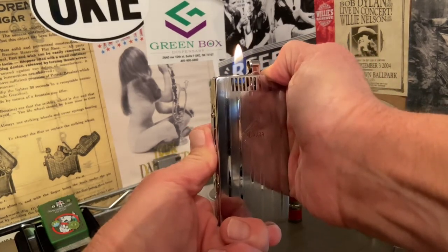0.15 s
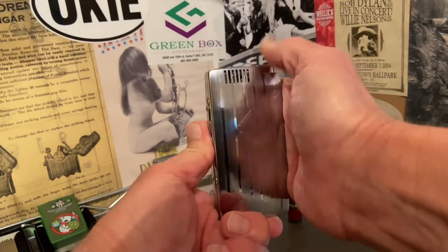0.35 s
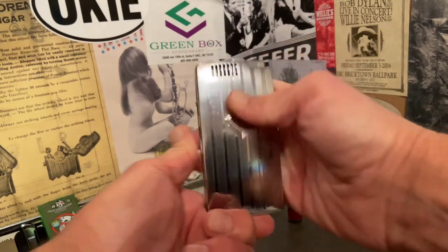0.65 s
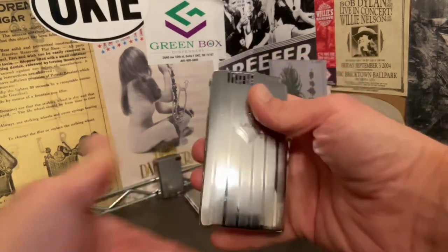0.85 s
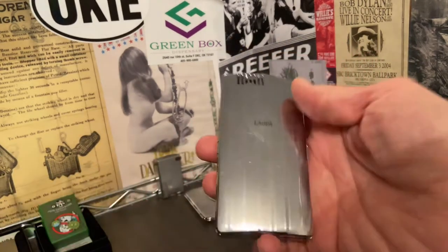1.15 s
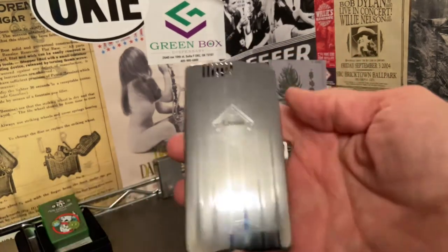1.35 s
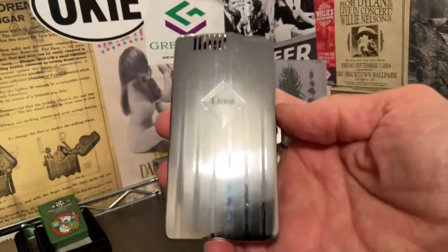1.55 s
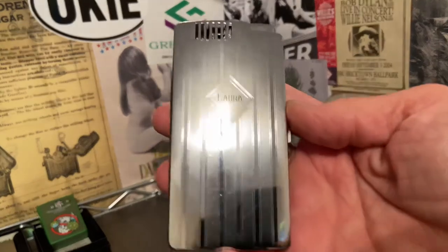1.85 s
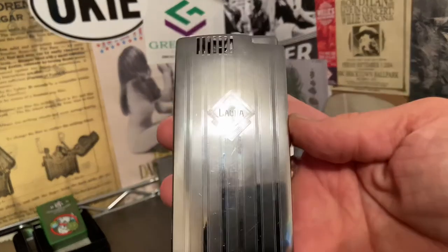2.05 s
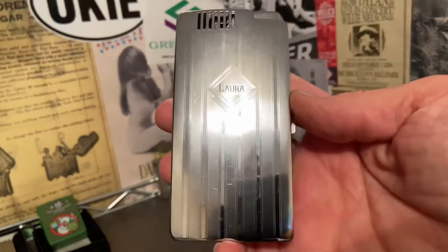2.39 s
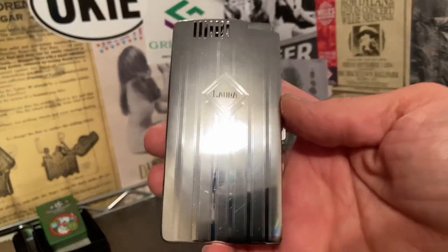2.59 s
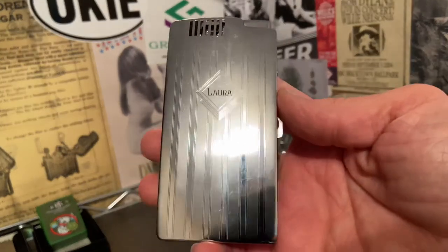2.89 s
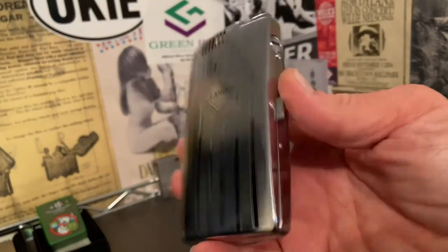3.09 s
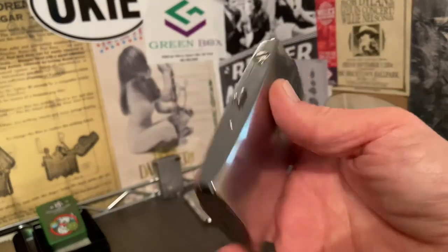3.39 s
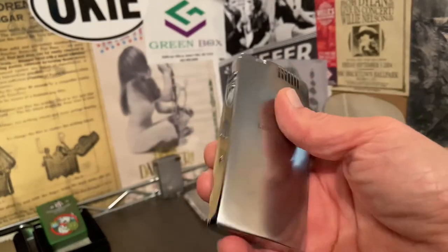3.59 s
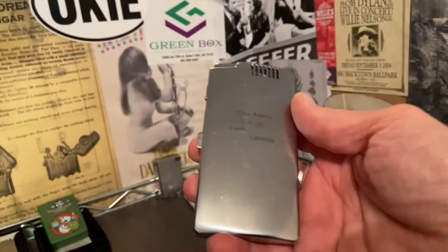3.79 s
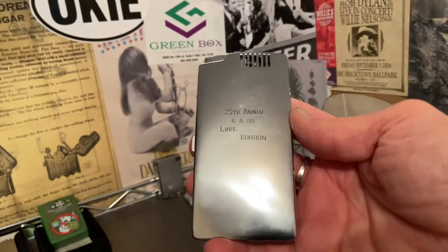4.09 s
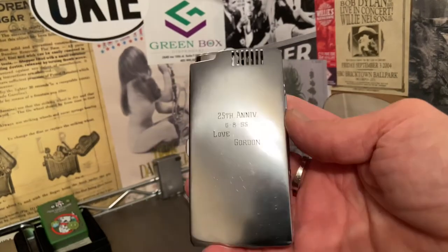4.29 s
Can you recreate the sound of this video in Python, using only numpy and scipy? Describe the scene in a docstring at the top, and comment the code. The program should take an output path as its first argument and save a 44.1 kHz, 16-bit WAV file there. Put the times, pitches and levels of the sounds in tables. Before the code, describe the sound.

In a small quiet room, close to a stereo microphone, a metal lighter cap snaps shut almost at once with a bright, dry crack. A damped clack of the thin metal case follows near one second, then a thumb drags across it with a brief squeak. Soft finger rustles come later, strongest near three and a half seconds. A low wavering hum continues throughout.

```python
"""A small metallic snap, one clack, a dragging thumb and rustling fingers are heard over a low room hum.
A metal cigarette case with a built-in lighter is handled close to a two-port microphone: its cap snaps
shut and the case knocks in the hand, each as a burst of noise plus fading sine tones. Skin slipping on
the metal is grainy noise, squeaks are narrow gliding noise, and echoes are sparse random reflections.
The hum is a wavering tone with bands of noise for rumble, drone and air."""
import sys
import numpy as np
from scipy import signal
from scipy.fft import rfft, irfft
from scipy.io import wavfile
from scipy.ndimage import uniform_filter1d

SR = 44100
rng = np.random.default_rng(int(sys.argv[2]) if len(sys.argv) > 2 else 0)


def dump(signal):
    """Clip the signal to [-1, 1] and save it as 16-bit WAV at the path in sys.argv[1]."""
    limited = np.clip(np.atleast_2d(signal).T, -1, 1)
    pcm = np.round(limited * 32767).astype(np.int16)
    wavfile.write(sys.argv[1], SR, pcm)


N = 195759
TIME = np.arange(N) / SR  # seconds
HZ = np.fft.rfftfreq(N, 1 / SR)  # the frequencies in a spectrum of the whole sound

# The cap's catch and stop. Each row: start in seconds, level in dB over 10 ms, contact decay in seconds,
# brightness in dB per octave, ring against contact in dB.
CAP_SNAPS = [(.1975, -69.5, .001, 5, -3), (.2010, -59.5, 0.0081, -7.5, -9), (.2090, -63, 0.0047, -9.5, -6),
             (.2160, -52.5, 0.0045, -8.5, -3.5), (.2252, -57, .001, -1, -7), (.2279, -35.5, .00044, 8, -2),
             (.2290, -42.5, .004, -4.5, -9), (.2366, -43, .0022, .5, -2.5), (.2385, -23.5, .0006, 2.5, -7),
             (.2398, -27, .0013, -1, -9.5)]
# Knocks on the case. Each row: start in seconds, level in dB over 10 ms, contact decay in seconds,
# brightness in dB per octave, ring against contact in dB (low where a finger damps it).
CASE_KNOCKS = [(.442, -80, 0.009, -3, -4), (.468, -74, .0045, -7, -7.5), (.509, -72, 0.0074, -11, 2),
               (.5765, -60, 0.0053, -6.5, -8), (.600, -69.5, 0.0038, -14, -9),
               (.716, -73, 0.011, -6.5, -3.5), (.9464, -35, 0.0027, -1, 4),
               (.9530, -51.5, 0.0083, -4, -6.5), (1.1795, -59.5, 0.0057, -6.5, 10),
               (1.954, -75.5, 0.0016, -8, -13.5)]
# Tones the cap rings with. Each row: pitch in Hz, relative level in dB, time to fade by 60 dB in seconds.
CAP_MODES = [(760, -12.5, 0.039), (936, -12, 0.093), (1396, -9, .03), (1793, -16.5, .03),
             (2909, -17.5, 0.046), (3395, -13.5, 0.035), (4590, -25, 0.087), (5460, -8, 0.028),
             (6316, -13, .03), (7180, -13, 0.043), (8640, -16, 0.028), (10240, -9.5, 0.0199),
             (10836, -14.5, .04), (11906, 3.5, 0.017), (11900, -4, 0.014), (14080, -5, 0.018),
             (15800, -4, .018)]
# Tones the case rings with. Each row: pitch in Hz, relative level in dB, time to fade by 60 dB in seconds
# before the hand damps it.
CASE_MODES = [(640.4, -21.5, 0.063), (924, -5, 0.067), (1175, -12.5, 0.16), (1267, -5.5, 0.16),
              (1584, 1.5, 0.038), (1750, 6.5, 0.037), (1863, -3, 0.23), (2000, -19.5, 0.11),
              (2202, -15, 0.2), (2287, -8.5, 0.21), (2670, -8, 0.19), (3070, -4, 0.28), (3340, -1.5, 0.086),
              (4070, -6, 0.1), (6110, -15.5, .07), (6880, -15.5, 0.059), (7860, -27.5, .06),
              (8900, -20.5, 0.049)]
# Colour of the contact noise on the cap. Each row: frequency in Hz, relative level in dB per Hz.
CAP_CONTACT = [(250, -31), (480, -24.5), (720, 2), (1000, -5), (1500, -11), (2200, -12.5), (3200, -7.5),
               (4400, -11.5), (5400, -4), (7200, -1.5), (8600, -2), (10500, -1.5), (11500, 4.5),
               (12900, -11.5), (14800, -0.5)]
# Colour of the contact noise on the case. Each row: frequency in Hz, relative level in dB per Hz.
CASE_CONTACT = [(250, -31.5), (480, -24), (750, -4), (1050, 0.5), (1700, 1.5), (2500, -6), (4000, -2),
                (5500, -5), (8000, 1.5), (10300, -9), (12000, -11), (15500, -20)]
# The thumb's strokes across the face. Each row: firmest moment in seconds, length in seconds,
# grip level in dB, sliding hiss level in dB.
THUMB_STROKES = [(1.106, .13, -66.5, -81.5), (1.16, 0.1, -62, -77), (1.206, 0.065, -56, -83)]
# The fingers' strokes on the edges. Each row: firmest moment in seconds, length in seconds,
# grip level in dB, sliding hiss level in dB.
FINGER_STROKES = [(.692, 0.049, -80, -71.5), (1.345, 0.12, -92, -84), (1.415, 0.095, -91, -78),
                  (1.615, 0.47, -90, -79.5), (2.88, 0.53, -85.5, -92), (3.055, 0.061, -88, -81),
                  (3.088, .11, -78, -91), (3.158, 0.08, -72.5, -86), (3.28, 0.26, -80.5, -82),
                  (3.372, 0.097, -70.5, -73.5), (3.478, 0.067, -66, -79), (3.502, 0.091, -69.5, -63),
                  (3.545, 0.11, -76, -72), (3.63, .15, -95, -81)]
# Resonances of the shell under the thumb. Each row: centre in Hz, width in Hz, relative level in dB.
PRESSED_SHELL = [(920, 43, -3), (1113, 21, -3), (1220, 44, -5), (1550, 47, -23), (1824, 21, 3),
                 (2000, 74, -14), (2176, 74, -7), (2794, 60, -11), (3120, 240, -22.5), (3690, 24, -11.5),
                 (4930, 62, -22.5)]
# Resonances of the shell held by its edges. Each row: centre in Hz, width in Hz, relative level in dB.
HELD_SHELL = [(1157, 130, 1.5), (1244, 80, 5.5), (1533, 130, 3), (2050, 140, -2.5), (2160, 110, 0),
              (2870, 100, -3), (3160, 49, -9), (3400, 26, -12), (4100, 57, -14), (4840, 130, -12),
              (5900, 41, -12)]
# Colour of the hiss of sliding skin. Each row: frequency in Hz, relative level in dB per Hz.
SKIN_HISS = [(500, -25), (1200, -9), (2400, 0.5), (3000, 4), (4300, 1), (5100, 4), (6000, -3.5),
             (7300, 1.5), (8500, -10.5), (11300, -2), (13000, -1.5), (15500, -8.5)]
# Squeaks of a fingertip on the polish. Each row: start in seconds, length in seconds, first pitch in Hz,
# last pitch in Hz, width in Hz, level in dB.
SQUEAKS = [(0.557, 0.077, 7000, 7200, 250, -80.5), (1.063, 0.19, 7290, 7030, 705, -79),
           (1.088, 0.047, 1570, 1510, 69.6, -66.5), (1.149, 0.089, 6140, 6100, 355, -73),
           (1.17, 0.04, 1212, 1070, 81, -48), (1.95, .014, 1283, 1250, 60.3, -70.5),
           (3.031, .046, 7960, 7740, 600, -85), (3.239, .11, 4450, 3860, 197, -84.5),
           (3.316, 0.1, 3920, 3820, 160, -82), (3.576, 0.076, 3830, 3830, 200, -87)]
# Level of the room's low hum, before its random wavering. Each row: time in seconds, level in dB.
HUM_LEVEL = [(0.0, -59), (0.27, -45), (1.07, -54), (1.38, -49.5), (1.53, -57), (1.67, -44.5), (1.84, -57.5),
             (2.16, -40), (2.26, -54), (2.45, -43.5), (3.06, -49.5), (3.15, -38), (3.5, -46), (3.57, -55.5),
             (3.95, -55.5), (3.98, -50), (4.41, -54.5), (4.44, -66)]
# Resonances of the deep rumble. Each row: centre in Hz, width in Hz, relative level in dB.
DEEP_RUMBLE = [(59.2, 5.2, 0), (72.4, 36, -8.5)]
# Resonances of the upper rumble. Each row: centre in Hz, width in Hz, relative level in dB.
UPPER_RUMBLE = [(120, 7, 2), (143, 3.5, 1.5), (160, 5.2, -2.5), (167.4, 27, -10.5), (200, 7.6, -7),
                (221, 4.1, -4)]
# Resonances of the drone. Each row: centre in Hz, width in Hz, relative level in dB.
DRONE = [(258.5, 5.9, 1.5), (300, 8.4, -15), (340.8, 9.3, -9), (390, 59, -29.5)]
# Level of the drone. Each row: time in seconds, level in dB.
DRONE_LEVEL = [(0.0, -68.5), (1.05, -63.5), (1.17, -73), (1.8, -59), (1.82, -67), (2.84, -64.5),
               (3.08, -54), (3.65, -66.5), (4.21, -63), (4.31, -78), (4.44, -70)]
# Colour of the room's air noise. Each row: frequency in Hz, relative level in dB per Hz.
AIR = [(20, -11), (40, 1), (150, 19), (300, 6), (420, 0), (520, -8.5), (700, -9.5), (1200, -19),
       (2500, -23.5), (5000, -25.5), (8000, -31), (11500, -32), (13000, -38), (16000, -43)]
# How the two microphone ports differ. Each row: frequency in Hz, left lead in radians, left minus right in dB.
PORTS = [(297, 0, -0.5), (654.8, 1.4, 1.5), (950, 1, 1.5), (1230, 1.44, 2.5), (1710, 0.82, 2.5),
         (2259, 0.5, 1), (2950, 1.56, 3), (3940, 0.88, 3), (5330, 1.45, 4), (7366, 0.3, 1.5),
         (10584, -6.5, -1.5), (12100, -7.5, 2), (13285, -10, -1), (15800, -11.5, -0.5), (15850, -9, 2)]

HAND_DAMPING_DB_PER_S = 299.5  # the palm shortens the ring of the case
# a stroke swells for this share of its length, then relaxes; its ends lie STROKE_EDGE_DB under its top
STROKE_RISE, STROKE_EDGE_DB, STROKE_CURVE = .42, 18, 1.5
# the hum wavers at random in pitch and level
HUM_HZ, HUM_WANDER_HZ, HUM_WANDER_DB, HUM_WANDERS_PER_S = 99.15, 1.9, 1.33, 5
# the upper rumble takes a share of the hum's swells
DEEP_DB, UPPER_DB, UPPER_FOLLOWS = -54, -54, 0.45
AIR_DB = -65.5
LOW_CUT_HZ, EDGE_HZ = 40, 15900


def cap_snaps():
    """The lighter's cap hits its catch and stop, which makes it crack and ring."""
    return blows(CAP_SNAPS, CAP_MODES, CAP_CONTACT, side_db=-9.0)


def case_knocks():
    """The case is knocked in the hand, which damps its ring."""
    return blows(CASE_KNOCKS, CASE_MODES, CASE_CONTACT, side_db=-5.0, damping_db_per_s=HAND_DAMPING_DB_PER_S)


def blows(rows, modes, colour, side_db, damping_db_per_s=0, size=2048):
    """Each blow is a short chatter of contacts together with the ring of the struck part."""
    out = np.zeros((2, N))
    t = np.arange(SR // 4) / SR
    bins = np.fft.rfftfreq(size, 1 / SR)
    for s, db, decay, tilt_db, ring_db in rows:
        def tilt(hz):
            """Brightness in dB, pivoting at 3000 Hz."""
            return tilt_db * np.log2(np.clip(hz, 700, 12000) / 3000)

        contact = (t / decay) ** .5 * np.exp(-t / decay)
        chatter = pair(*(rng.standard_normal((2, len(t))) * contact), side_db)
        colouring = causal(read(colour, bins) + tilt(bins), size)
        chatter = signal.fftconvolve(chatter, colouring[None])[:, :len(t)]
        ring = np.zeros(len(t))
        for hz, mode_db, t60 in modes:
            fade_db = (60 / t60 + damping_db_per_s) * t
            ring += amp(mode_db + tilt(hz) - fade_db) * np.sin(2 * np.pi * (hz * t + rng.random()))
        ring *= 1 - np.exp(-2 * t / decay)  # builds up while the contact lasts
        sound = unit(unit(chatter) + amp(ring_db) * unit(ring))
        sound *= np.sqrt(.01 / t[-1])  # levels are given as if the energy filled 10 ms
        add(out, s, amp(db) * sound)
    return out


def thumb_drags():
    """The thumb pushes across the face of the case, in coarse slips."""
    return rub(THUMB_STROKES, PRESSED_SHELL, shell_side_db=-10, hiss_side_db=-16, grain_db=5, ripple_db=8)


def finger_rustle():
    """Fingers shift on the edges as they turn the case round, in finer slips."""
    return rub(FINGER_STROKES, HELD_SHELL, shell_side_db=-9.0, hiss_side_db=-14.0, grain_db=2.5, ripple_db=7.5)


def rub(strokes, shell, shell_side_db, hiss_side_db, grain_db, ripple_db):
    """Tiny slips of skin ring the shell where it grips, and hiss through its crowded upper modes as it glides."""
    grip_power, glide_power = np.zeros(N), np.zeros(N)
    for s, length, grip_db, hiss_db in strokes:
        stroke_db = pressure(s, length)
        grip_power += amp(stroke_db + grip_db) ** 2
        glide_power += amp(stroke_db + hiss_db) ** 2
    # random bumps in the hiss spectrum stand for the crowded modes
    bumps = rng.uniform(-1, 1, size=200)
    crowded_db = ripple_db * np.interp(HZ, np.linspace(0, SR / 2, num=200), bumps)
    ring = noise(peaks(shell), shell_side_db, grain_db) * np.sqrt(grip_power)
    hiss = noise(amp(read(SKIN_HISS, HZ) + crowded_db), hiss_side_db, grain_db) * np.sqrt(glide_power)
    return ring + hiss


def pressure(s, length):
    """Level in dB of one stroke: the finger bears down, then relaxes more slowly."""
    away = np.maximum((s - TIME) / STROKE_RISE, (TIME - s) / (1 - STROKE_RISE)) / length
    return -STROKE_EDGE_DB * np.minimum(away, 10) ** STROKE_CURVE


def squeaks():
    """Stick and slip: a narrow band of noise that swells, glides in pitch and dies."""
    out = np.zeros((2, N))
    for s, length, start_hz, end_hz, width, db in SQUEAKS:
        count = int(length * SR)
        narrow = 1 / (1 + (2 * HZ / width) ** 2)
        flutter = irfft(rfft(rng.standard_normal((2, N))) * narrow, N)[:, :count]
        phase = 2 * np.pi * np.cumsum(np.linspace(start_hz, end_hz, count)) / SR
        tone = unit(flutter[0] * np.cos(phase) + flutter[1] * np.sin(phase))
        add(out, s, amp(db) * (tone * np.hanning(count))[None])
    return out


def room(x, wet_db, t60_low, t60_high, gap=0.0057, side_db=-3):
    """Sparse reflections from the shelf and walls, partly shared by both sides; bass and treble fade apart."""
    t = np.arange(SR // 2) / SR
    strengths = rng.standard_normal((2, len(t)))
    present = rng.random((2, len(t))) < .15
    taps = pair(*(strengths * present * (t > gap)), side_db)
    # let each frequency fade at its own rate
    hz, at, z = signal.stft(taps, SR, nperseg=256)
    t60 = read([(1500, t60_low), (14000, t60_high)], hz)[:, None]
    tail = signal.istft(z * amp(-60 * at / t60), SR, nperseg=256)[1]
    tail /= np.linalg.norm(tail[0])
    return x + amp(wet_db) * signal.fftconvolve(x, tail, axes=1)[:, :N]


def hum_tone(level_db):
    """A sine near 100 Hz that wavers in pitch and level."""
    pitch = HUM_HZ + HUM_WANDER_HZ * wander(HUM_WANDERS_PER_S)
    tone = np.sqrt(2) * np.sin(2 * np.pi * np.cumsum(pitch) / SR)
    return tone * amp(level_db + HUM_WANDER_DB * wander(HUM_WANDERS_PER_S)) * pan(left_db=4.5)


def rumble(hum_db):
    """Noise in the low resonances of the room: a steady deep part and an upper part that follows the hum."""
    deep = steadied(noise(peaks(DEEP_RUMBLE), side_db=-13.5), span=.25) * amp(DEEP_DB) * pan(left_db=1.3)
    upper_db = UPPER_DB + UPPER_FOLLOWS * (hum_db - hum_db.mean())
    upper = steadied(noise(peaks(UPPER_RUMBLE), side_db=-12.5), span=.25)
    return deep + upper * amp(upper_db) * pan(left_db=1.78)


def drone():
    """Faint resonant noise above the hum, swelling and fading."""
    level_db = np.interp(TIME, *np.transpose(DRONE_LEVEL))
    return steadied(noise(peaks(DRONE), side_db=-12), span=.25) * amp(level_db) * pan(left_db=-0.94)


def air():
    """Steady broad noise, weaker towards the treble."""
    return amp(AIR_DB) * noise(amp(read(AIR, HZ)), side_db=-4.5)


def hum():
    """The background: tone, rumble, drone and air added up."""
    level_db = np.interp(TIME, *np.transpose(HUM_LEVEL))
    return hum_tone(level_db) + rumble(level_db) + drone() + air()


def noise(gain, side_db, grain_db=0):
    """Stereo noise of a given spectrum; grain makes single slips stand out."""
    # a fresh random strength every 16 samples
    size = amp(grain_db * np.minimum(rng.exponential(1, N // 16 + 1), 4)).repeat(16)[:N]
    mid, side = irfft(rfft(rng.standard_normal((2, N)) * size) * gain, N)
    return pair(unit(mid), unit(side), side_db)


def peaks(rows):
    """Gain of a set of resonances, added by power."""
    return np.sqrt(sum((amp(db) / (1 + ((HZ - hz) / width) ** 2)) ** 2 for hz, width, db in rows))


def causal(gain_db, size):
    """Minimum-phase impulse response: a filter with this gain that reacts as early as it can."""
    cepstrum = irfft(gain_db * np.log(10) / 20)
    cepstrum[1:size // 2] *= 2
    cepstrum[size // 2 + 1:] = 0
    return irfft(np.exp(rfft(cepstrum)))


def steadied(x, span):
    """Evens out the swells of a noise that last longer than span seconds."""
    power = uniform_filter1d((x ** 2).mean(0), max(int(span * SR), 1))
    return x / np.sqrt(power + 1e-9)


def wander(per_s):
    """Slow random wavering with an rms of 1."""
    return unit(irfft(rfft(rng.standard_normal(N)) * np.exp(-(HZ / per_s) ** 2), N))


def amp(db):
    """Turns dB into a plain factor."""
    return 10 ** (np.asarray(db) / 20)


def unit(x):
    """Scales to an rms of 1."""
    return x / np.sqrt(np.mean(x ** 2) + 1e-30)


def read(points, hz):
    """Reads a spectrum along a log-frequency axis."""
    f, value = np.transpose(points)
    return np.interp(np.log(hz + 1), np.log(f), value)


def add(mix, s, sound):
    """Mixes a sound in at time s."""
    part = mix[:, max(round(s * SR), 0):][:, :sound.shape[1]]
    part += sound[:, :part.shape[1]]


def pan(left_db):
    """Gains of the two channels."""
    return amp([[left_db / 2], [-left_db / 2]])


def pair(mid, side, side_db):
    """Left and right from a shared part and a difference."""
    return np.array([mid + amp(side_db) * side, mid - amp(side_db) * side])


def scene():
    """Cap, case and fingers in the room, over its hum."""
    cap = room(cap_snaps(), wet_db=-19.0, t60_low=.34, t60_high=0.16)
    case = room(case_knocks(), wet_db=-11, t60_low=.21, t60_high=0.13)
    skin = thumb_drags() + finger_rustle() + squeaks()
    return cap + case + room(skin, wet_db=-7.5, t60_low=0.12, t60_high=0.17) + hum()


def record(dry):
    """A low cut, short fades at both ends, two ports that drift out of step in the treble, a band limit."""
    heard = signal.sosfilt(signal.butter(4, LOW_CUT_HZ, "high", fs=SR, output="sos"), dry)
    heard = heard * signal.windows.tukey(N, .004)
    # each port takes half of the difference in phase and level
    hz, lead, left_db = np.transpose(PORTS)
    sides = np.array([[.5], [-.5]])
    bins = np.fft.rfftfreq(1024, 1 / SR)
    ports = amp(sides * np.interp(bins, hz, left_db)) * np.exp(1j * sides * np.interp(bins, hz, lead))
    heard = signal.oaconvolve(heard, np.fft.fftshift(irfft(ports), axes=1), "same", axes=1)
    band_limit = signal.firwin(255, EDGE_HZ, window=("kaiser", 8), fs=SR)
    return signal.oaconvolve(heard, band_limit[None], "same")


dry = scene()
out = record(dry)
dump(out)
```